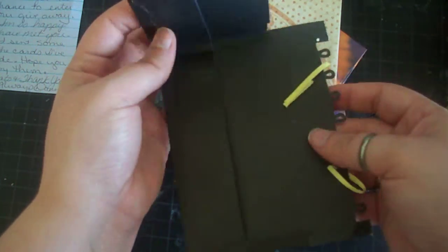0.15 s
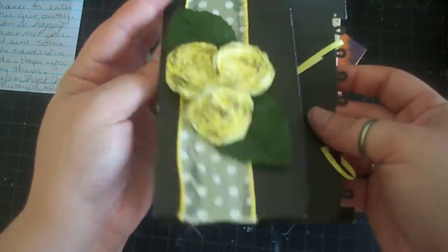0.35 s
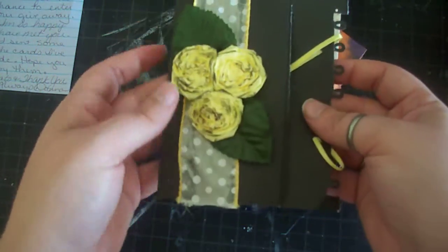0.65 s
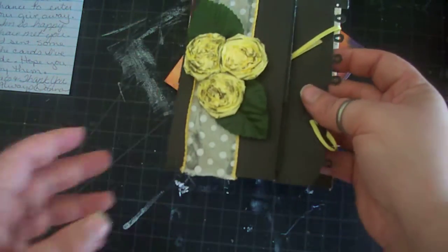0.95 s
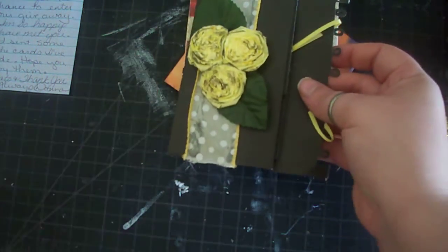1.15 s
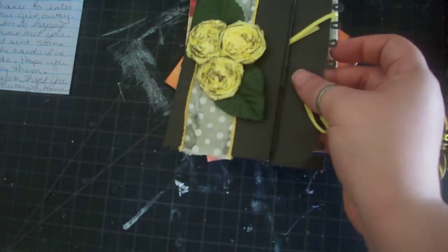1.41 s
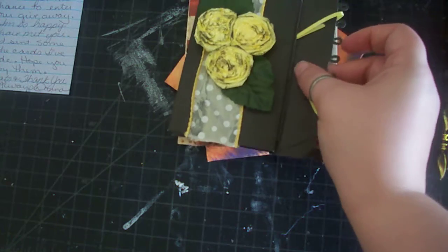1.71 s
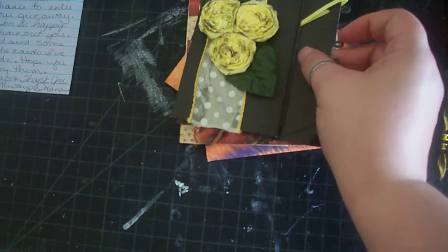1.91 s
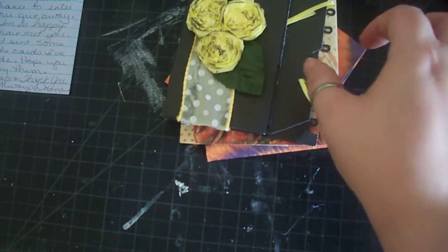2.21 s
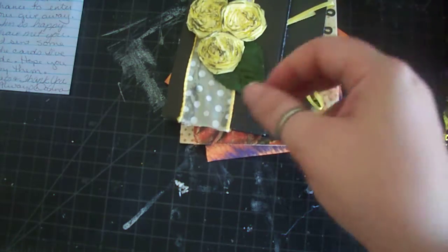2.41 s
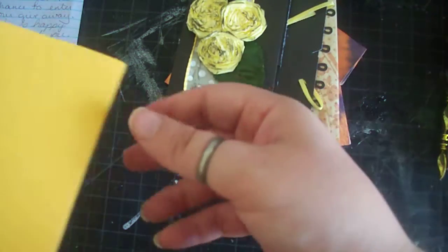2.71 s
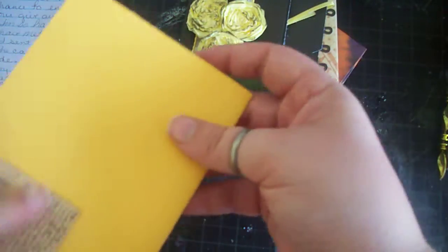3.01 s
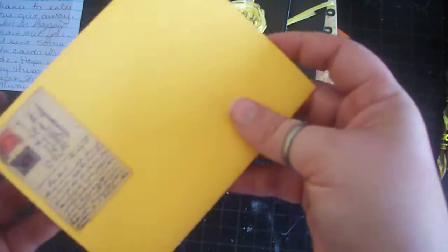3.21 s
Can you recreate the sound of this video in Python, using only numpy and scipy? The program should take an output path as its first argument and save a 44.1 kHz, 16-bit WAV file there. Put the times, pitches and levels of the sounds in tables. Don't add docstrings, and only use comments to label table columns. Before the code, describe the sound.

Handmade paper card being handled, crisp snaps and short grainy swishes above distant traffic drone

```python
import sys
import numpy as np
from scipy import signal
from scipy.fft import rfft, irfft
from scipy.io import wavfile
from scipy.ndimage import uniform_filter1d

SR = 44100
rng = np.random.default_rng(int(sys.argv[2]) if len(sys.argv) > 2 else 0)


def wav_out(sig):
    wavfile.write(sys.argv[1], SR, np.round(np.clip(np.atleast_2d(sig).T, -1, 1) * 32767).astype(np.int16))


def nominal_scale(level):
    x = np.asarray(level, float) / 20
    return 10 ** x


N = 147735
T = np.arange(N) / SR

# (start [s], length [s], level [dB], lowest frequency set ringing [Hz], rise share of length [0-1])
RUBS = [(-.02, 0.082, -55.5, 1490, 0.69), (0.096, 0.049, -53.5, 845, 0.32), (0.166, 0.023, -48, 3600, 0.46),
        (0.224, 0.063, -56, 2750, 0.32), (0.31, 0.029, -61, 2350, 0.11), (0.327, 0.13, -48, 1100, 0.53),
        (0.47, 0.096, -50, 2300, 0.16), (0.6, 0.24, -58, 2500, 0.85), (2.692, 0.024, -48, 1228, 0.9),
        (1.42, 0.08, -55.5, 1500, 0.5), (1.513, 0.15, -54, 1910, 0.44), (1.683, 0.085, -56, 1800, 0.67),
        (1.765, 0.1, -51.5, 1020, 0.15), (1.83, 0.12, -51, 1100, 0.59), (1.895, 0.23, -53, 1893, 0.76),
        (2.038, 0.061, -51.5, 1100, 0.95), (2.147, 0.024, -62, 710, 0.35), (2.184, 0.23, -63.5, 3030, 1),
        (2.614, 0.11, -55.5, 5230, 0.81), (2.918, 0.069, -55, 1164, 0.29),
        (2.986, 0.028, -49.5, 2056, 0.094), (3.006, 0.031, -53, 1240, 0.4), (3.017, 0.11, -59, 2050, 0.38),
        (3.326, 0.049, -58, 2940, 0.21), (0.047, 0.14, -60.5, 3070, 0.51), (0.184, 0.017, -63, 3000, 0.59),
        (2.094, 0.12, -53, 1500, 0.084)]
# (centre [Hz], width [Hz], level [dB])
CARD_MODES = [(1100, 920, -9), (1695, 1020, 0.5), (2330, 510, -11), (3800, 1300, -1.5), (5660, 2370, -3.5),
              (7340, 5450, 5)]
# (time [s], firing rate [Hz], level [dB])
ENGINE_A = [(0.0, 101.5, -39), (0.294, 80.2, -55.5), (0.422, 89.2, -49), (0.596, 110.3, -44.5),
            (0.98, 115.7, -58.5), (1.1, 114, -66)]
ENGINE_B = [(1.2, 81.9, -51), (1.326, 79.1, -56), (1.978, 97.87, -44.5), (2.272, 106.9, -48.5),
            (2.3, 105.9, -41.5), (2.442, 102.6, -48), (2.706, 89.9, -55), (2.95, 84, -46)]
# (time [s], frequency [Hz], level [dB])
DRONE = [(0.0, 58.6, -39), (0.12, 55.9, -46), (0.74, 54.73, -44.5), (1.02, 66.2, -40.5),
         (1.16, 66.2, -48.5), (1.41, 50.9, -55), (1.56, 56.4, -47.5), (2.2, 53.92, -51.5),
         (2.65, 57.96, -48.5), (3.0, 55, -44), (3.07, 54, -54), (3.19, 50, -55), (3.26, 58.8, -41),
         (3.35, 57, -50)]
# (frequency [Hz], density [dB per Hz])
AIR_SPECTRUM = [(110, -31), (180, -1), (302, -4.5), (760, -10.5), (1590, -14), (4060, -17.5), (7600, -20),
                (9880, -53), (16700, -120)]
# (time [s], peak [dB], low mode [Hz], high mode [Hz], T60 [s])
TICKS = [(0.1097, -39, 1600, 7400, 0.0072), (0.1166, -36, 1600, 6500, .006),
         (0.1267, -30.5, 1050, 3500, .008), (0.174, -50, 4600, 6500, 0.011), (0.281, -44, 1000, 3500, .01),
         (.3085, -37, 2900, 4800, 0.012), (.315, -45, 3000, 5400, .012), (0.3436, -49, 4260, 6500, 0.014),
         (.381, -36, 2100, 7000, .016), (0.4032, -44, 1500, 3500, 0.0089),
         (0.4099, -23.5, 1600, 3900, 0.01), (0.4108, -26.5, 2600, 6800, .01),
         (0.4739, -30, 1000, 2800, 0.0088), (.483, -40, 5000, 7200, .014), (1.159, -43, 1520, 2700, .02),
         (1.4538, -30.5, 2900, 5770, 0.015), (1.445, -47, 1800, 5000, 0.018),
         (1.7693, -38, 1620, 6000, 0.014), (1.893, -32.5, 2690, 7000, 0.025),
         (1.921, -39, 3500, 5770, .011), (2.069, -38, 1500, 6000, 0.016), (2.0806, -33.5, 1300, 2600, .014),
         (2.084, -23, 4000, 6800, .013), (2.099, -42, 3000, 6800, 0.014), (2.1112, -35, 2370, 5800, .022),
         (2.12, -42, 2300, 4000, .01), (2.15, -50, 4000, 6500, 0.011), (2.152, -33, 1300, 2600, 0.025),
         (2.16, -36, 1300, 5300, 0.021), (2.4903, -31, 2300, 3300, .012), (2.4994, -43, 2000, 3500, 0.018),
         (2.7063, -44, 1200, 6050, 0.013), (2.917, -41, 1200, 3000, 0.012), (2.923, -30, 3420, 5400, 0.013),
         (2.925, -31.5, 1200, 3420, 0.011), (2.935, -25.5, 2600, 4240, .008),
         (2.9435, -46, 1500, 4000, 0.0053), (2.9888, -43, 1000, 6060, 0.0073),
         (3.0275, -35.5, 2550, 5500, 0.017), (.6085, -47, 4000, 6300, .012)]
# (start [s], length [s], level [dB], hollow resonance
# 1 [Hz], hollow resonance 2 [Hz])
DRAGS = [(0.11, 0.494, -59, 400, 962), (0.22, 0.43, -60.5, 290, 893), (0.24, 0.31, -62.5, 1430, 1740),
         (1.03, 0.17, -61.5, 1540, 2700), (1.02, 0.19, -64, 3320, 5900), (0.97, 0.28, -70, 240, 650),
         (0.572, 0.26, -60.5, 423, 940), (1.4, 0.083, -67, 5800, 2840), (1.6, 0.034, -66, 6700, 7300),
         (1.5, 0.17, -70.5, 330, 2100), (2.141, 0.035, -53, 262, 468), (2.2, .035, -59.5, 370, 600),
         (2.92, 0.028, -61, 460, 830), (2.98, 0.023, -60.5, 363, 660), (3.25, 0.56, -58.5, 494, 920),
         (1.7, 0.1, -65.5, 450, 680), (1.892, 0.026, -56.5, 2860, 7200), (1.88, .05, -66, 320, 1140),
         (1.4, 0.086, -68, 1530, 770), (1.14, .045, -61, 1560, 2500), (2, .12, -64, 3900, 3200),
         (2.69, .025, -60, 3000, 6000), (.81, .08, -60.5, 3400, 4200), (.605, .03, -66, 3900, 1000),
         (2.33, .09, -66, 3000, 6500)]
# (time [s], peak [dB], body mode 1 [Hz], body mode 2 [Hz], T60 [s])
TAPS = [
    (1.3415, -44, 560, 1035, 0.051),
    (2.924, -46.5, 267, 348, 0.059),
    (1.957, -46.5, 195, 220, 0.061),
    (.4085, -45.5, 1700, 1300, 0.038),
]
# (start [s], length [s], level [dB], from [Hz], to [Hz])
TWITTER = [(0.668, 0.015, -68, 3740, 4070), (.695, 0.033, -70, 3250, 3380), (0.72, 0.062, -70, 3680, 3800),
           (0.773, 0.035, -64.5, 4250, 4680), (0.797, 0.025, -66.5, 4410, 3600),
           (0.812, 0.031, -68, 3030, 3670), (0.846, 0.035, -72.5, 3236, 2960),
           (2.167, 0.028, -64, 3675, 4160), (2.201, 0.015, -66, 3030, 3100),
           (2.218, 0.024, -67.5, 3660, 3610), (3.242, 0.024, -64, 4270, 4207),
           (3.276, 0.017, -64, 3920, 3800), (3.28, 0.091, -71.5, 4070, 3690)]

GRAIN_DB, GRAIN_S, FIBRE_PATCHY_DB = 1.6, .0003, 1.2
GRIP_SHIFT_SHARE, GRIP_DB, FLAT_DB = .04, 1.2, -1
ROAD_DB, ROAD_LO_HZ, ROAD_HI_HZ, SUB_DB = -54.5, 44, 116.8, -57
AIR_DB, AIR_SWELL_DB = -60.5, .5
CRACK_DB, SLIP_DB, SLIP_SHARE, TICK_Q = -6, -1, .15, 7.5
TICK_TAIL_DB, TICK_TAIL_T60_S = -25, .06
DRAG_PATCHY_DB, DRAG_EDGE_POWER = 1.2, .45
TAP_FILL_DB, BIRD_ECHO_DB = -4, 0
HIT_SAMPLES = 4096
MIC_TOP_HZ, MIC_OFFSET = 8510, .0014


def unit(x):
    return x / np.sqrt(np.mean(x ** 2))


def band(x, lo_hz, hi_hz, order=2):
    sos = signal.butter(order, [lo_hz, min(hi_hz, .45 * SR)], "band", fs=SR, output="sos")
    return signal.sosfilt(sos, x)


def resonate(x, hz, q):
    return signal.lfilter(*signal.iirpeak(hz, q, fs=SR), x)


def decay(t, t60_s):
    return np.exp(-np.log(1000) * t / t60_s)


def walk(rate_hz):
    hold = int(SR / rate_hz)
    steps = np.repeat(rng.standard_normal(N // 20), hold)[:N]
    return 1.228 * uniform_filter1d(uniform_filter1d(steps, hold), hold)


def swell(start_s, length_s, rise):
    a = max(int(start_s * SR), 0)
    b = min(int((start_s + length_s) * SR), N)
    u = (T[a:b] - start_s) / length_s
    rise = np.clip(rise, .02, .98)
    ramp = np.clip(np.minimum(u / rise, (1 - u) / (1 - rise)), 0, 1)
    return a, b, np.sin(np.pi / 2 * ramp)


def fibres():
    hold = max(int(GRAIN_S * SR), 4)
    size = np.repeat(rng.exponential(size=N // 4), hold)[:N]
    level_db = GRAIN_DB * size + FIBRE_PATCHY_DB * walk(150)
    return unit(rng.standard_normal(N) * nominal_scale(level_db))


def rubs():
    out, slip = np.zeros(N), fibres()
    mode_hz, width_hz, mode_db = np.array(CARD_MODES).T
    grips = rng.standard_normal((len(RUBS), 2, len(CARD_MODES)))
    for (start_s, length_s, db, low_hz, rise), (shift, gain) in zip(RUBS, grips):
        a, b, env = swell(start_s, length_s, rise)
        high_pass = signal.butter(2, low_hz, "high", fs=SR, output="sos")
        x = signal.sosfilt(high_pass, slip[a:b])
        grip_hz = mode_hz * (1 + GRIP_SHIFT_SHARE * shift)
        grip_db = mode_db + GRIP_DB * gain - 10 * np.log10(width_hz / 1000)
        ring = np.zeros(b - a)
        for k, hz in enumerate(grip_hz):
            ring += (-1) ** k * nominal_scale(grip_db[k]) * resonate(x, hz, hz / width_hz[k])
        flat = nominal_scale(FLAT_DB) * unit(band(x, 740, 12000, order=1))
        out[a:b] += nominal_scale(db) * env * unit(unit(ring) + flat)
    return out


def engine(curve, wobble_share, flutter_db):
    s, hz, db = np.array(curve).T
    edge = np.clip(np.minimum(T - s[0] + 0.097, s[-1] + 0.13 - T) / 0.3, 0, 1)
    cycles = np.cumsum(np.interp(T, s, hz) * (1 + wobble_share * walk(11))) / SR
    level_db = np.interp(T, s, db) - 0.5 + flutter_db * walk(16)
    return edge * nominal_scale(level_db) * np.sin(2 * np.pi * cycles)


def traffic():
    rumble = unit(band(rng.standard_normal(N), ROAD_LO_HZ, ROAD_HI_HZ, order=5))
    road = nominal_scale(ROAD_DB + 1.4 * walk(3.4)) * rumble
    sub = nominal_scale(SUB_DB) * unit(band(rng.standard_normal(N), 14, 69))
    engines = engine(ENGINE_A, 0.02, 1.3) + engine(ENGINE_B, 0.014, 3.7) + engine(DRONE, 0.0702, 3.75)
    return engines + road + sub


def air():
    hz, db = np.array(AIR_SPECTRUM)[1:-2].T
    f = np.arange(N // 2 + 1) * SR / N + 1e-3
    gain = nominal_scale(np.interp(np.log(f), np.log(hz), db))
    gain = gain * np.clip(f / 110, 0, 1) ** 3 * (f < 9500)
    hiss = unit(irfft(rfft(rng.standard_normal(N)) * gain, N))
    return nominal_scale(AIR_DB + AIR_SWELL_DB * walk(7.1)) * hiss


def ticks():
    out, t = np.zeros(N + HIT_SAMPLES), T[:HIT_SAMPLES]
    noise = rng.standard_normal((len(TICKS), 2, HIT_SAMPLES))
    chance = rng.random((len(TICKS), HIT_SAMPLES))
    for (s, db, low_hz, high_hz, t60_s), (x, rustle), u in zip(TICKS, noise, chance):
        after_slips = nominal_scale(SLIP_DB) * x * (u < SLIP_SHARE) * decay(t, t60_s)
        push = after_slips + (t == 0)
        ring = unit(resonate(push, low_hz, TICK_Q)) + unit(resonate(push, high_hz, TICK_Q))
        hit = ring + nominal_scale(CRACK_DB) * unit(band(push, 0.6 * low_hz, 9000, order=1))
        tail = unit(band(rustle, low_hz, 7900, order=1)) * decay(t, TICK_TAIL_T60_S)
        i = int(s * SR)
        out[i:i + HIT_SAMPLES] += nominal_scale(db) * (hit / np.abs(hit).max() + nominal_scale(TICK_TAIL_DB) * tail)
    return out[:N]


def drags():
    out = np.zeros(N)
    slip = rng.standard_normal(N) * nominal_scale(DRAG_PATCHY_DB * walk(40))
    for start_s, length_s, db, hz_1, hz_2 in DRAGS:
        a, b, env = swell(start_s, length_s, 0.4)
        hollow_1 = unit(band(slip[a:b], hz_1 / 1.194, hz_1 * 1.22))
        hollow_2 = unit(band(slip[a:b], hz_2 / 1.07, hz_2 * 1.152))
        out[a:b] += nominal_scale(db) * env ** DRAG_EDGE_POWER * (hollow_1 + 0.59 * hollow_2)
    return out


def taps():
    out, t = np.zeros(N + HIT_SAMPLES), T[:HIT_SAMPLES]
    noise = rng.standard_normal((len(TAPS), HIT_SAMPLES))
    for (s, db, hz_1, hz_2, t60_s), x in zip(TAPS, noise):
        modes = np.sin(2 * np.pi * hz_1 * t) + np.sin(2 * np.pi * hz_2 * t)
        thud = unit(band(x, 0.49 * min(hz_1, hz_2), 1.22 * max(hz_1, hz_2)))
        env = decay(t, t60_s) * np.minimum(t / 0.001, 1)
        i = int(s * SR)
        out[i:i + HIT_SAMPLES] += nominal_scale(db) * (modes + nominal_scale(TAP_FILL_DB) * thud) * env
    return out[:N]


def bird():
    out, waver, rasp = np.zeros(N), walk(200), walk(700)
    for start_s, length_s, db, from_hz, to_hz in TWITTER:
        a, b, env = swell(start_s, length_s, 0.36)
        hz = np.linspace(from_hz, to_hz, b - a) * (1 + 0.025 * waver[a:b])
        whistle = np.sin(2 * np.pi * np.cumsum(hz) / SR)
        out[a:b] += nominal_scale(db + 6.5) * env * (.5 + rasp[a:b]) * whistle
    echo = rng.standard_normal(6000) * decay(T[:6000], 0.46)
    echo = echo / np.sqrt(np.sum(echo ** 2))
    return out + nominal_scale(BIRD_ECHO_DB) * signal.fftconvolve(out, echo)[:N]


def scene():
    return np.array([rubs() + traffic() + air() + ticks() + drags() + taps() + bird()])


def top_cut(x):
    return signal.sosfilt(signal.butter(12, 8990, fs=SR, output="sos"), x)


def record(dry):
    x = signal.sosfilt(signal.butter(6, MIC_TOP_HZ, fs=SR, output="sos"), dry)
    x = signal.sosfilt(signal.cheby2(10, 50, 9300, fs=SR, output="sos"), x)
    return top_cut(x + MIC_OFFSET)


dry = scene()
out = record(dry)
wav_out(out)
```